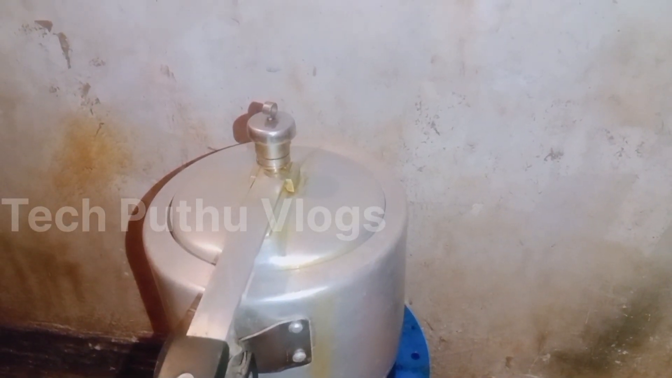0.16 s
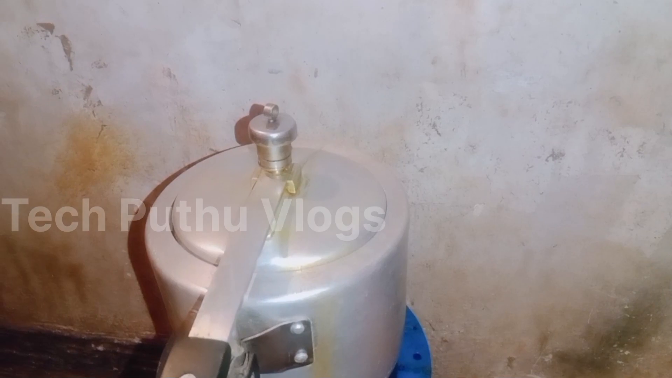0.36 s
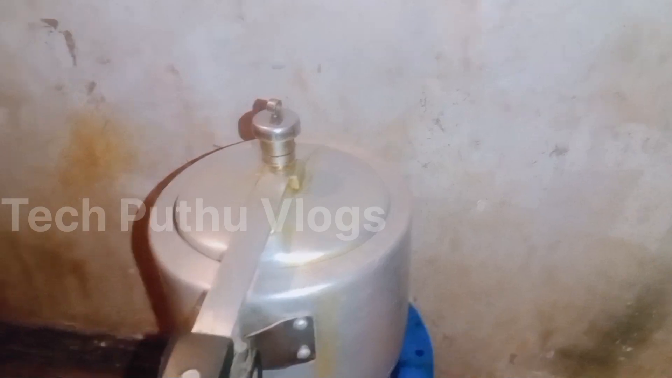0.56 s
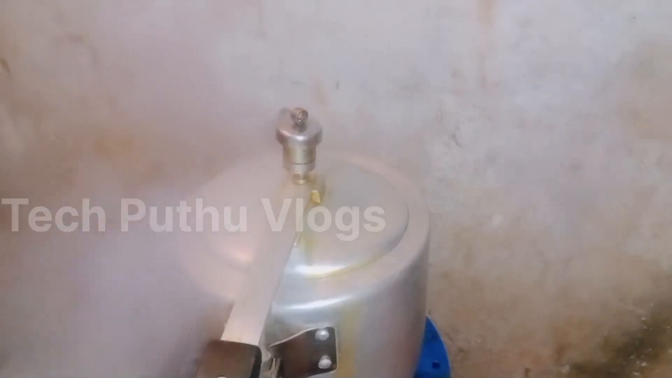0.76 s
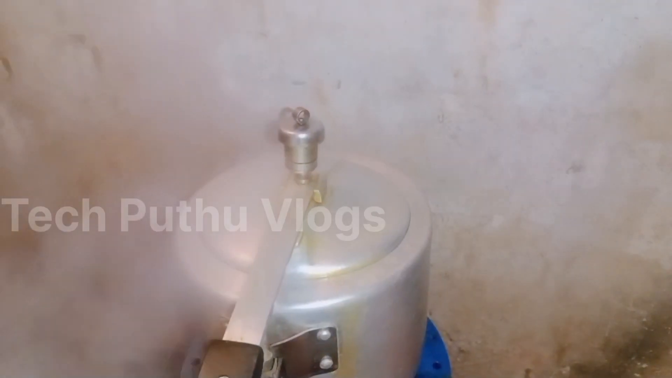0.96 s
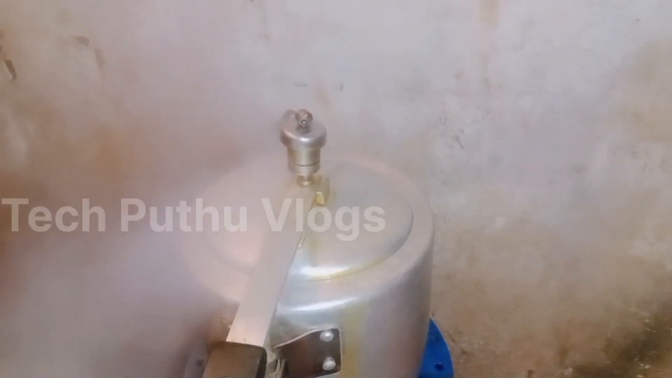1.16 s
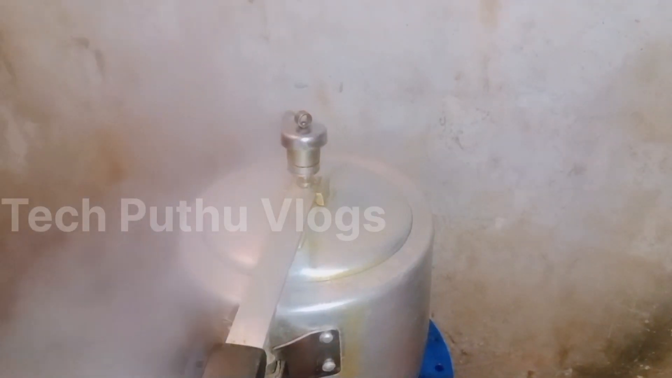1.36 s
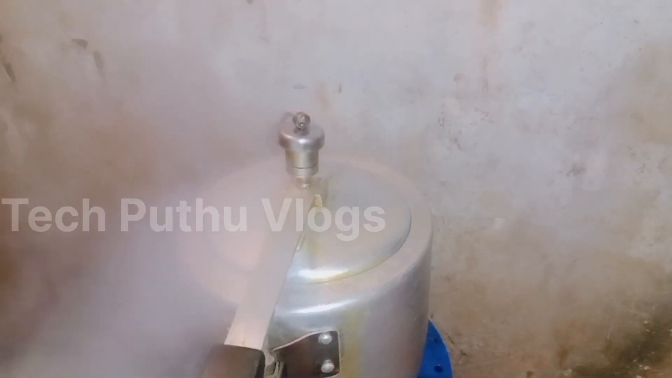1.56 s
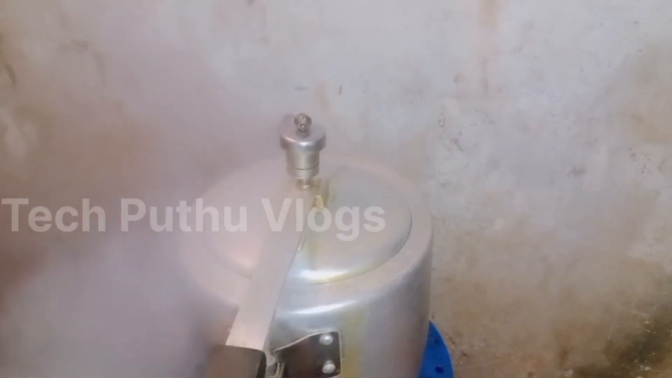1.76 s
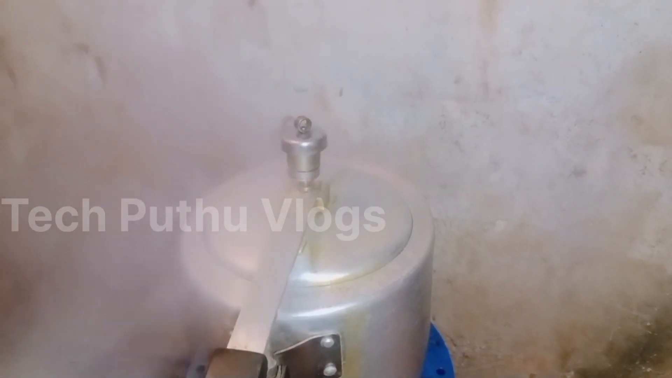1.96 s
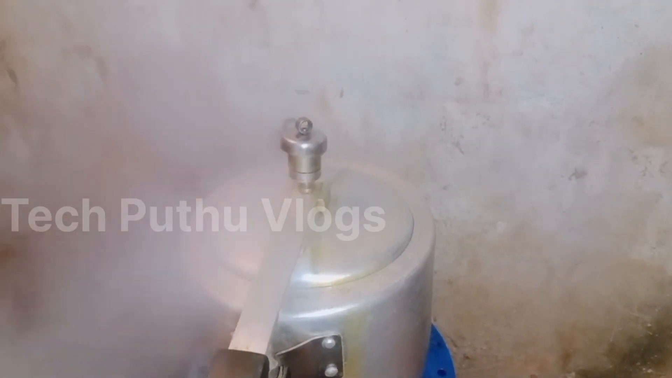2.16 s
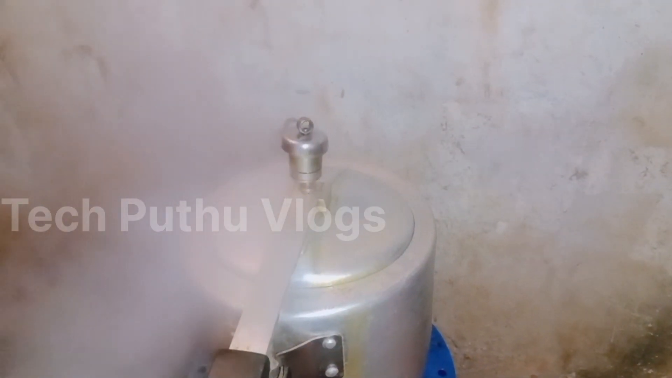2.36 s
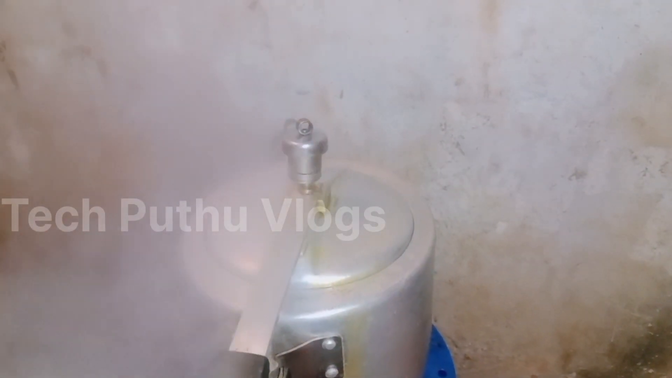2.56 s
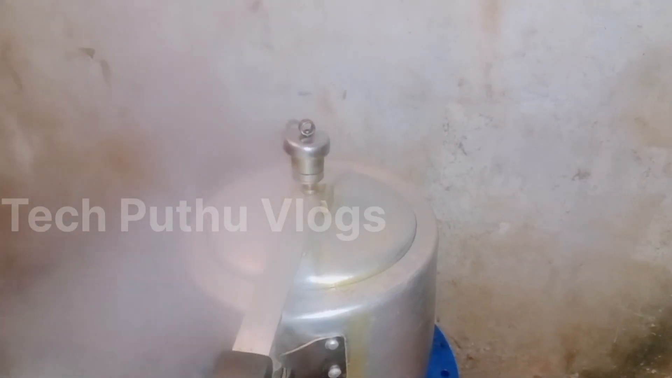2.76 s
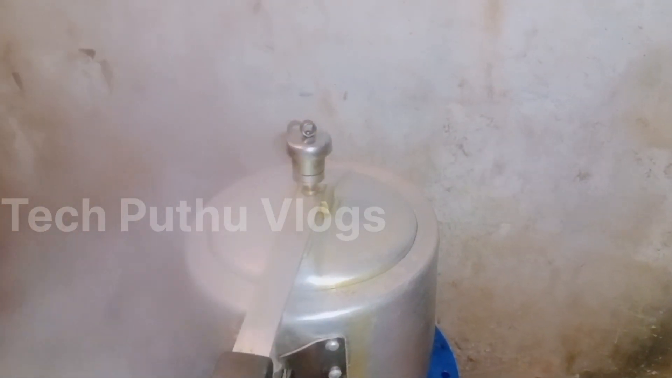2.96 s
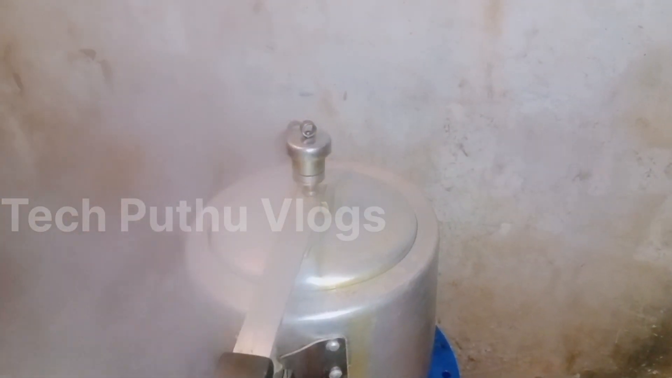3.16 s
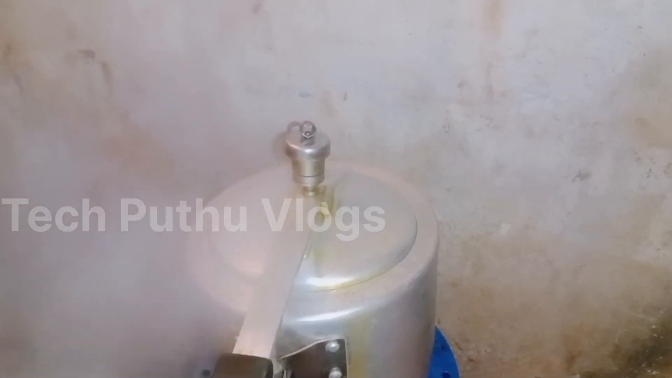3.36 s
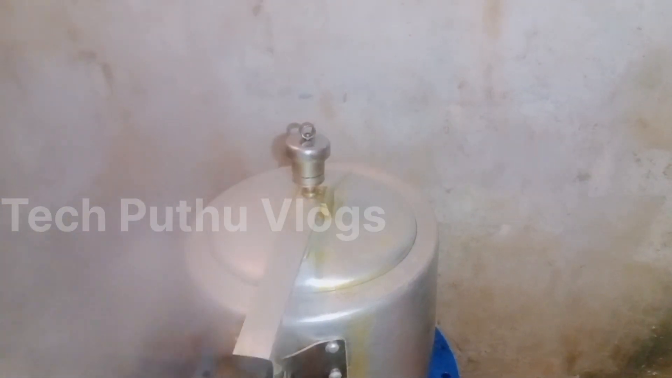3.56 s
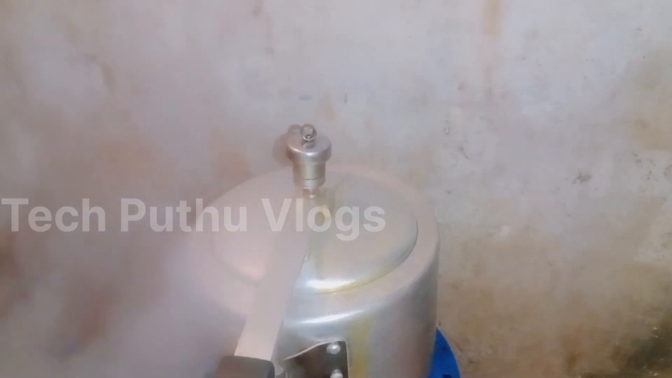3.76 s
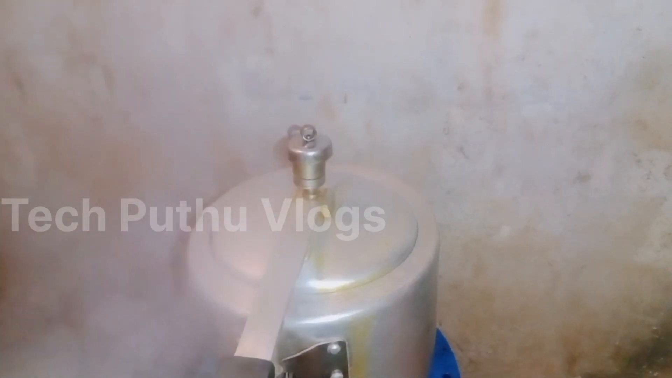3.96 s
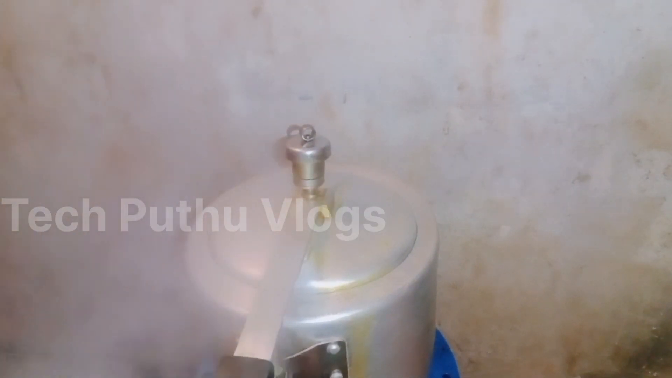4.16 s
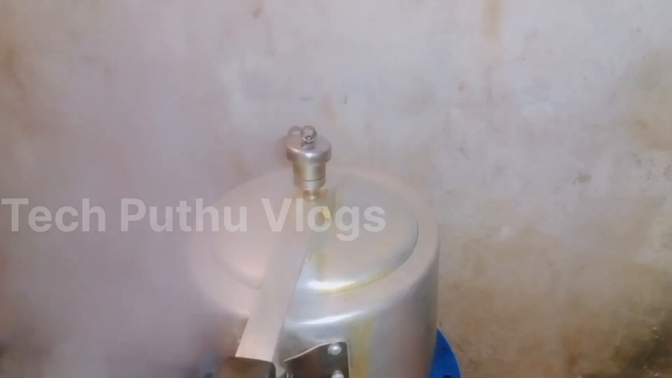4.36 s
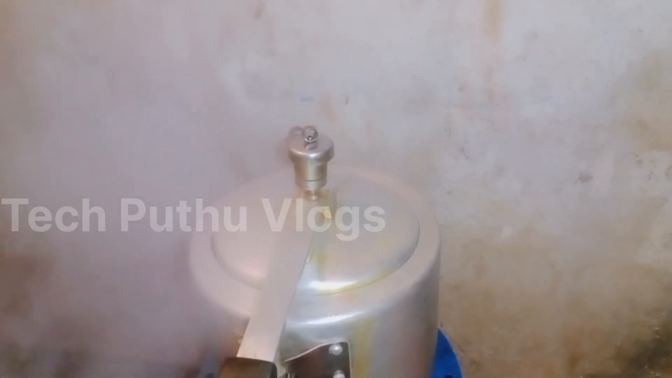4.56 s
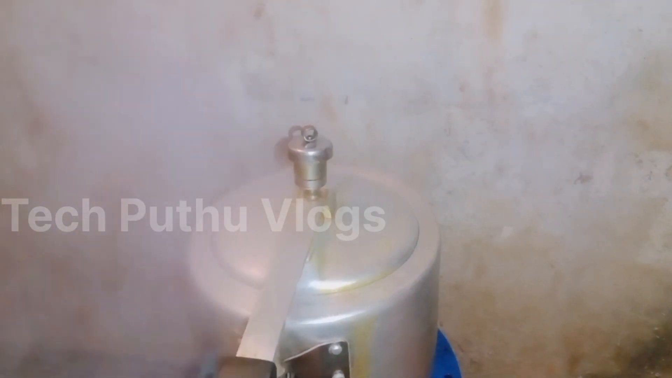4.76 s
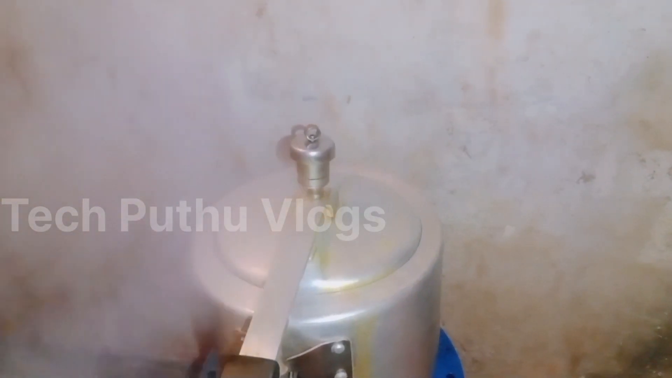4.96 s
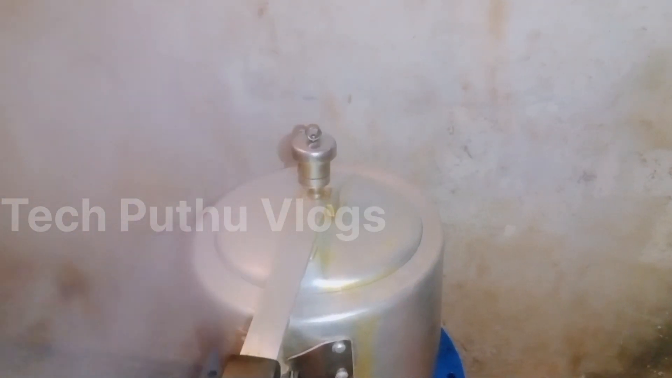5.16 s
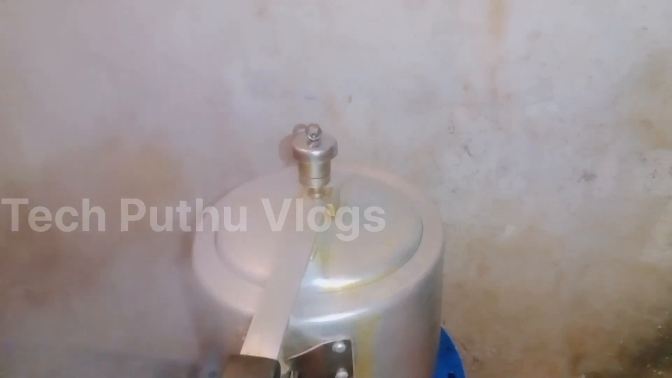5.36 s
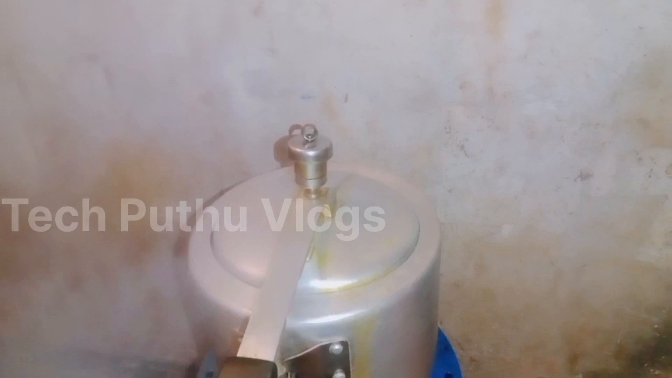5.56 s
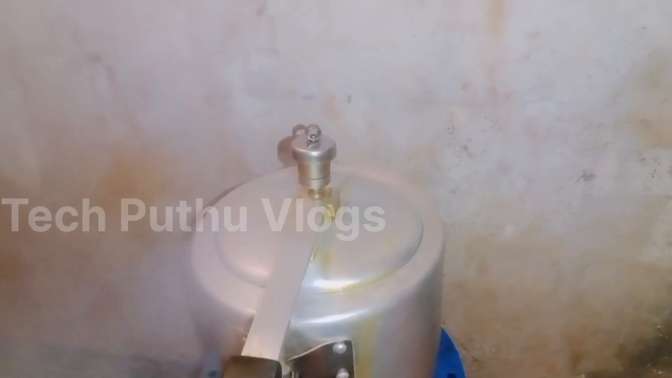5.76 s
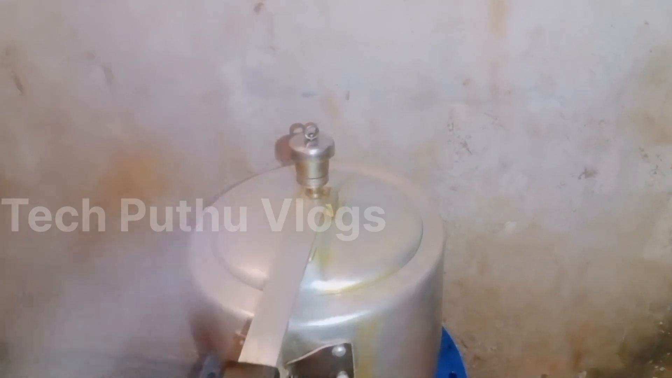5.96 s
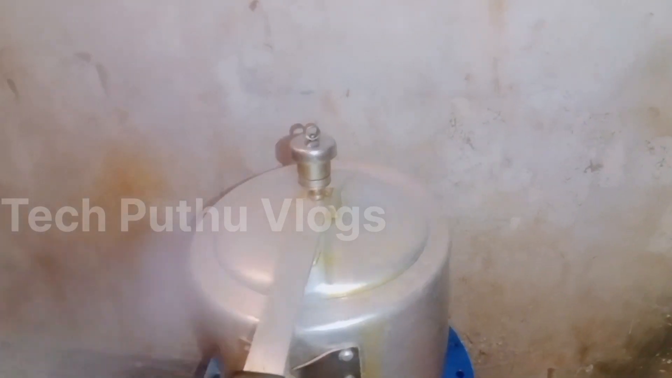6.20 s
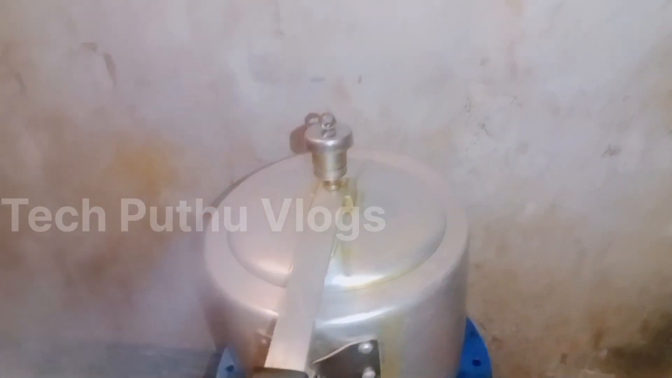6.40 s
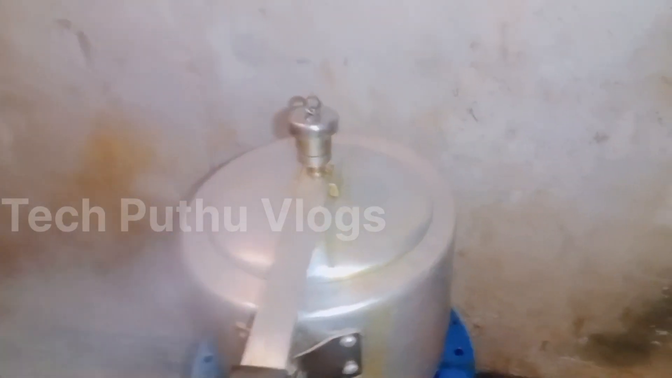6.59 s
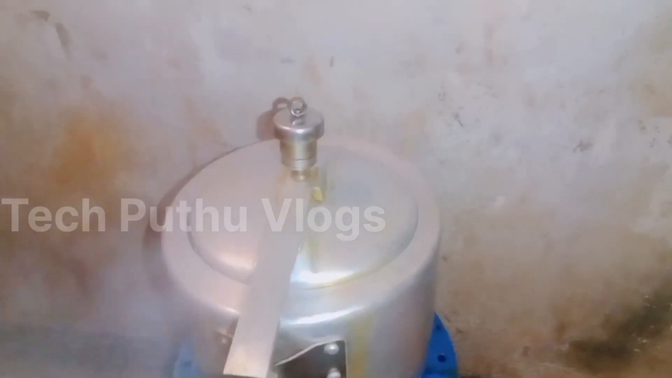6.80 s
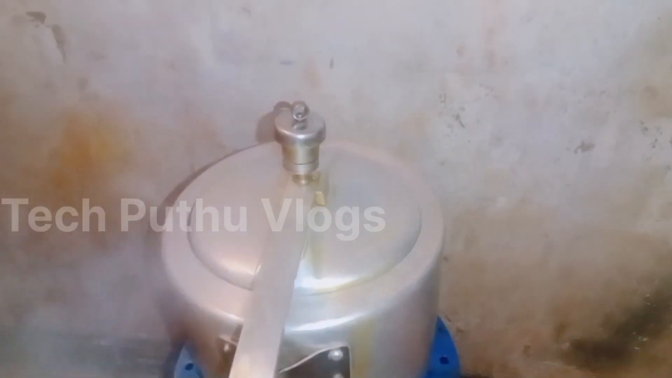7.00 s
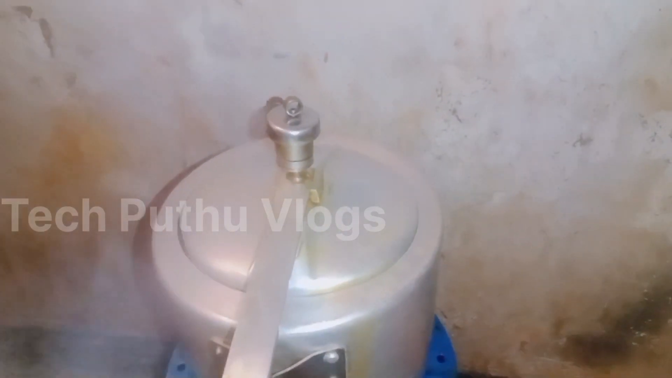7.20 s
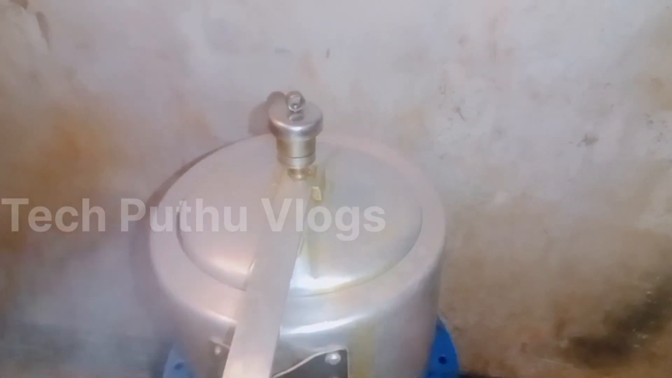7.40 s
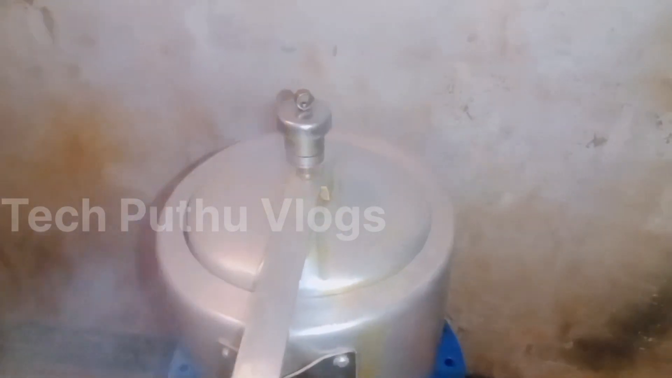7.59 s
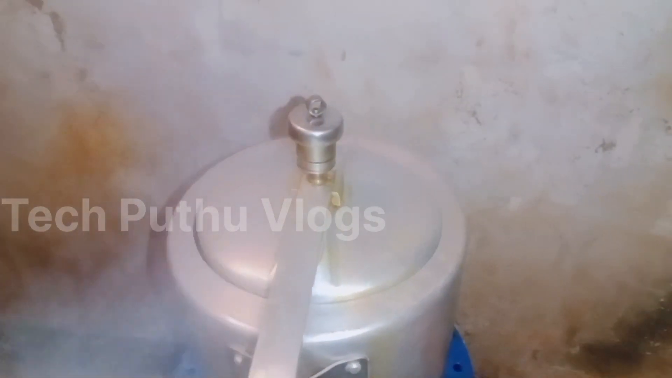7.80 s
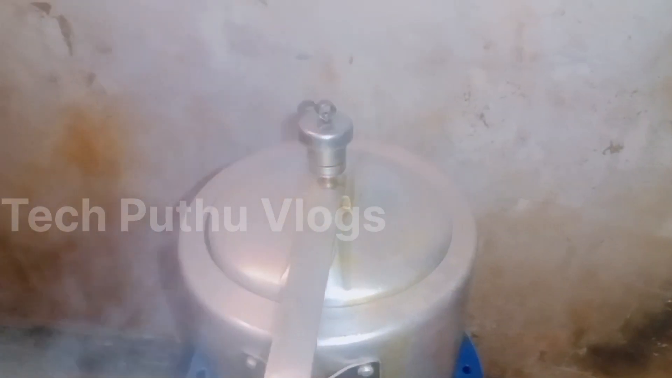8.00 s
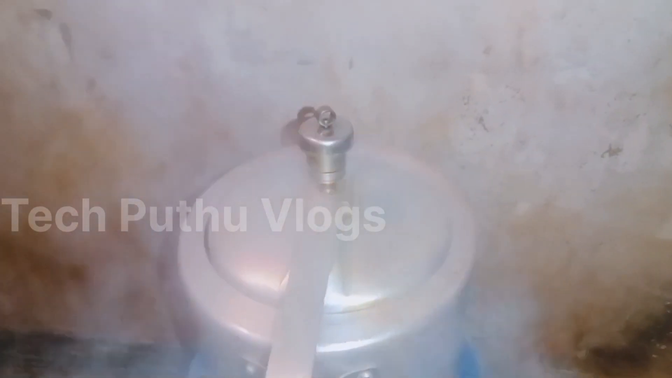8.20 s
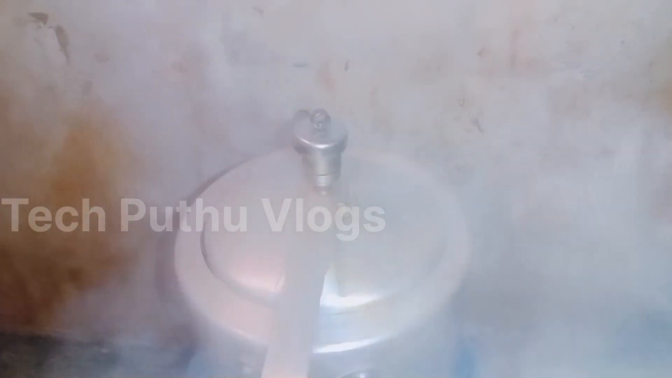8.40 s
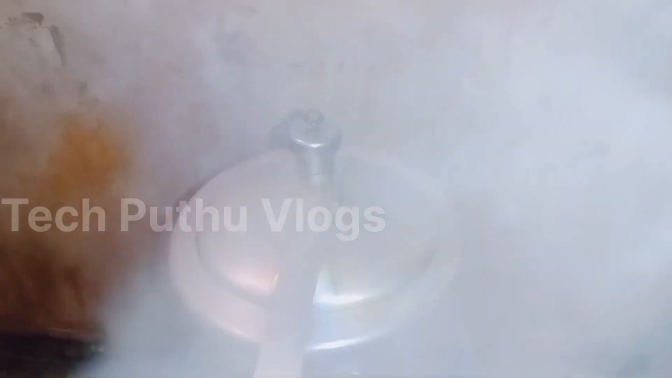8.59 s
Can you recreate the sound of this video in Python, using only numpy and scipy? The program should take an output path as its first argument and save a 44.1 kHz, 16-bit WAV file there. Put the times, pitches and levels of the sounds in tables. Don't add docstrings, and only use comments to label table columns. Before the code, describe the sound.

Pressure cooker leaks soft pulsing hisses, cuts to silence, then its open vent roars in a piercing, continuous metallic hiss, slowly easing.

```python
import sys
import numpy as np
from scipy import signal
from scipy.io import wavfile
from scipy.ndimage import uniform_filter1d

SR = 44100
rng = np.random.default_rng(int(sys.argv[2]) if len(sys.argv) > 2 else 0)


def transcribe(signal):
    frames = np.atleast_2d(signal).T
    limited = np.clip(frames, -1, 1)
    pcm = np.round(limited * 32767).astype(np.int16)
    wavfile.write(sys.argv[1], SR, pcm)


def attenuation_scalar(level_db):
    decades = np.asarray(level_db, float) / 20
    return 10 ** decades


N = 381024
TIME_S = np.arange(N) / SR


def evened(x):
    return x / np.sqrt(np.mean(x ** 2) + 1e-20)


def read(points, hz):
    f, value = np.transpose(points)
    return np.interp(np.log(hz + 1), np.log(f + 1), value)


def column(rows, k):
    rows = np.array(rows)
    return np.interp(TIME_S, rows[:, 0], rows[:, k])


def filtered(x, order, hz, kind="low"):
    return signal.sosfiltfilt(signal.butter(order, hz, kind, fs=SR, output="sos"), x)


def highpassed(x, order, hz):
    return signal.sosfilt(signal.butter(order, hz, "high", fs=SR, output="sos"), x)


def wander(per_s):
    return evened(filtered(rng.standard_normal(N), 2, per_s))


def turbulence(spectra, patchy_db, flicker_db, size=512):
    hop = size // 4
    frames, hz = N // hop + 5, np.fft.rfftfreq(size, 1 / SR)
    a, b, patches = rng.standard_normal((frames, len(hz), 3)).T
    patches = uniform_filter1d(patches, size=8, axis=0)
    patches = evened(uniform_filter1d(patches, size=24, axis=1))
    flicker = evened(uniform_filter1d(rng.standard_normal(frames), size=12))
    colour_db = sum(read(s, hz) for s in spectra)[:, None]
    z = (a + 1j * b) * attenuation_scalar(colour_db + patchy_db * patches + flicker_db * flicker)
    return evened(signal.istft(z, nperseg=size, noverlap=size - hop)[1][:N])


def resonate(x, hz, width):
    turn = np.exp(2j * np.pi * np.cumsum(hz * np.ones(len(x))) / SR)
    r = np.exp(-np.pi * width / SR)
    return 2 * (turn * signal.lfilter([1 - r], [1, -r], x / turn)).real


def narrow_noise(hz, width):
    return evened(resonate(resonate(rng.standard_normal(N), hz, width), hz, width))


# hz, density_db [dB per Hz]
ROOM_COLOUR = [(18, -31), (30, -4), (103, -1), (140, -14), (210, -6), (584, -14), (891, -9), (1100, -10),
               (1430, -39), (2420, -120)]


def room():
    return attenuation_scalar(-71.5) * turbulence([ROOM_COLOUR], patchy_db=0.5, flicker_db=-3.0, size=2048)


# hz, density_db [dB per Hz]
HAND_COLOUR = [(12, -12), (30, 0), (50, -8), (90, -40)]


def hand():
    return attenuation_scalar(-72) * turbulence([HAND_COLOUR], patchy_db=4.0, flicker_db=3.0, size=4096)


# start_s, length_s, pitch_hz, width_hz, level_db
STIR_EVENTS = [
    (.31, .05, 870, 120, -67),
    (.59, .1, 990, 30, -65),
    (0.49, 0.21, 75, 54, -66),
]


def stirs():
    out = np.zeros(N)
    for start_s, length_s, hz, width, db in STIR_EVENTS:
        swell = np.sin(np.pi * np.clip((TIME_S - start_s) / length_s, 0, 1))
        out += attenuation_scalar(db) * narrow_noise(hz, width) * swell
    return out


# peak_s, peak_db
PUFF_EVENTS = [(1.1, -33.5), (1.35, -39), (1.55, -32), (1.73, -33), (2.07, -34), (2.15, -41), (2.325, -41),
               (2.55, -49), (3.43, -44), (3.48, -46), (3.71, -38), (3.9, -41), (4.17, -43), (4.32, -44),
               (4.47, -49), (4.72, -37), (5.02, -41), (5.43, -39.5), (5.722, -44), (5.85, -50), (6.12, -48),
               (6.32, -36), (6.41, -49), (6.47, -44), (6.84, -43), (7.15, -52), (7.84, -54), (8.1, -53),
               (8.26, -53)]


def wash_db():
    calm_db, rise_db_per_s, fall_db_per_s = -59, 146, 145
    power = attenuation_scalar(2 * calm_db)
    for s, db in PUFF_EVENTS:
        slope_db = np.minimum(rise_db_per_s * (TIME_S - s), fall_db_per_s * (s - TIME_S))
        power = power + attenuation_scalar(2 * (db + slope_db))
    return 10 * np.log10(power)


# hz, density_db [dB per Hz]
BUFFET_COLOUR = [(25, -33), (55, -9), (100, -3), (200, 3.5), (450, -8.5), (900, -37)]
# hz, density_db [dB per Hz]
ROAR_BOTTOM_COLOUR = [(90, -40), (200, -15.5), (310, 5), (450, 1), (650, -3), (1000, -30)]


def buffeting():
    memory_s, follows, start_s = 0.19, 0.31, 1.08
    air_db = wash_db()
    lumps = attenuation_scalar(air_db) * turbulence([BUFFET_COLOUR], patchy_db=2.2, flicker_db=2.5, size=1024)
    stirred_db = follows * (uniform_filter1d(air_db, size=round(memory_s * SR)) - air_db.mean())
    swirl = turbulence([ROAR_BOTTOM_COLOUR], patchy_db=2.6, flicker_db=1.8)
    return lumps + (TIME_S >= start_s) * attenuation_scalar(-41.5 + stirred_db) * swirl


# start_s, size_db
INWARD_JUMPS = [(1.085, -5), (1.1034, -21), (1.1684, -10), (1.2321, -10), (1.3085, -14), (1.3614, 1.5),
                (1.473, -13), (1.5206, 6.5), (1.6802, -16), (1.7188, -2), (1.7198, 1.5), (1.7727, -9.8),
                (2.0382, -1), (2.1282, -15), (2.1555, -18), (3.4737, -6), (4.711, -7), (5.416, -12.5),
                (6.305, -19), (6.4387, -14)]
# start_s, size_db
OUTWARD_JUMPS = [(1.0943, -13.5), (1.2736, -7.5), (1.4457, -17), (1.4808, -8), (1.49, -18), (1.5115, -20),
                 (1.533, -10), (1.5653, -15.4), (1.706, -7), (1.7321, -8), (1.788, -7), (2.0812, -20),
                 (2.304, -14), (2.327, -24), (2.3355, -17), (3.4167, -6), (3.4262, -18), (6.422, -19.5)]


def pops():
    eddy_db, eddy_t60_s = -40, 0.064
    pressure, t = np.zeros(N), np.arange(3000) / SR
    for sign, rows in ((0.8, INWARD_JUMPS), (-1.22, OUTWARD_JUMPS)):
        for s, db in rows:
            relax_ms = 1.5 if sign > 0 else 2.8 + 0.1 * db
            hold = np.exp(-1000 / SR / max(relax_ms, .1))
            jumps = attenuation_scalar(eddy_db - 60 * t / eddy_t60_s) * rng.standard_normal(3000)
            jumps[0] = sign
            pressure[round(s * SR):][:3000] += attenuation_scalar(db) * signal.lfilter([1], [1, -hold], jumps)
    pressure = filtered(pressure, 1, 2400)
    pressure = highpassed(pressure, 1, 60)
    return highpassed(pressure, 2, 95)


# time_s, upper_hz, upper_db, lower_hz, lower_db
VENT_TONES = [(1.2, 2065, -39, 1620, -36), (4.5, 2160, -35.5, 1680, -61), (6.5, 2120, -40, 1710, -43),
              (6.95, 2180, -34, 1740, -50), (7.25, 2300, -36, 1770, -35.5), (7.7, 2410, -36, 1750, -35.5),
              (8.1, 2260, -35.5, 1760, -38.5), (8.64, 2270, -35, 1750, -40)]


def edge_tones():
    out = np.zeros(N)
    for k in (1, 3):
        hz = column(VENT_TONES, k) * (1 + 0.02 * wander(1.5))
        tone = narrow_noise(hz, width=200)
        out += attenuation_scalar(column(VENT_TONES, k + 1) + 2.5 * wander(19)) * tone
    return out


def kitchen(x, wet_db, t60, turns_per_s, count=5):
    t = np.arange(8000) / SR
    tails = rng.standard_normal((count, 8000)) * attenuation_scalar(-60 * t / t60) * (t > .002)
    tails = highpassed(tails / np.linalg.norm(tails), 1, 1300)
    rates = turns_per_s * (1 + np.arange(count) / count)
    drift = 2 * np.pi * (np.outer(rates, TIME_S) + rng.random((count, 1)))
    wet = sum(signal.oaconvolve(x, tail)[:N] * np.cos(d) for tail, d in zip(tails, drift))
    return evened(x + attenuation_scalar(wet_db) * wet * np.sqrt(2))


# pitch_hz, width_hz, level_db [over the jet]
POT_MODES = [(2042, 50, -4), (2317, 25, -1), (2870, 50, -2), (3190, 50, -3), (3300, 25, -3), (3741, 25, -6)]
# pitch_hz, width_hz, level_db [over the jet]
LID_MODES = [(5430, 20, 0), (5630, 20, 2), (5904, 22, 5), (6743, 18, 2), (6998, 22, 2), (7394, 25, 2),
             (7667, 40, -2), (7925, 30, -2), (10042, 25, -4), (10903, 25, -1)]


def ringing(jet):
    modes = POT_MODES + LID_MODES
    return jet + sum(attenuation_scalar(db) * resonate(jet, hz, width) / 2 for hz, width, db in modes)


# hz, density_db [dB per Hz]
PORT_COLOUR = [(1200, -13), (2250, -10), (3700, -11.5), (4300, -18), (4780, -30.5), (5200, -18.5),
               (6100, -12.5), (6950, -2), (7900, 1), (8950, -3.5), (9350, -13), (10100, -9.5),
               (13000, -16.5), (13900, -19.5)]
# hz, density_db [dB per Hz]
PORT_TOP = (15100, -11.5)


def steam(tilt, patchy_db, wet_db, turns_per_s, size):
    jet = turbulence([PORT_COLOUR + [PORT_TOP], tilt], patchy_db, flicker_db=0.5, size=size)
    return kitchen(ringing(jet), wet_db, t60=.2, turns_per_s=turns_per_s)


# peak_s, peak_db
THROB_EVENTS = [
    (-.02, -48),
    (.095, -41),
    (.2, -41.5),
    (.33, -41.5),
    (.45, -42.5),
    (.6, -36.5),
    (.72, -35),
]


def rocking_db():
    times, peaks_db = np.transpose(THROB_EVENTS)
    opening = .5 + .5 * np.cos(2 * np.pi * np.interp(TIME_S, times, np.arange(len(times))))
    rest_db = -43.5 - 90 * (np.diff(times) - 0.1)
    shut_db = np.interp(TIME_S, (times[1:] + times[:-1]) / 2, rest_db)
    return shut_db + opening * (np.interp(TIME_S, times, peaks_db) - shut_db)


# hz, level_db
LEAK_COLOUR = [(600, -40), (1150, -12), (1400, -0.5), (2300, -3.5), (3700, -9), (4800, -9), (5800, -0.5),
               (7700, 1), (11400, -3), (12700, 2), (15500, -6)]


def leak():
    hiss = steam(LEAK_COLOUR, patchy_db=2.5, wet_db=-7, turns_per_s=0.36, size=1024)
    low = filtered(hiss, 4, 4750)
    level_db = rocking_db()
    steadied_low = low * attenuation_scalar(-0.15 * (level_db + 46.0))
    return attenuation_scalar(level_db) * (hiss - low + steadied_low)


def sag(db_per_s):
    return -db_per_s * (TIME_S - 1.26)


# hz, level_db
BLAST_COLOUR = [(100, -72), (300, -12.5), (600, -1), (1200, 1), (10800, 1), (11400, -0.5), (12700, 4.5),
                (13900, 0.5), (15500, -1)]
# time_s, level_db [on the shrill band]
JET_AIM = [(1.25, 0.5), (1.85, -0.5), (2.3, 0.5), (2.9, -0.7), (3.35, 1), (3.7, -0.5), (4.25, 0),
           (4.55, -1), (4.9, -0.1), (5.75, 0.3), (6.05, -1), (6.35, 1), (6.65, -0.5), (7.1, 0.8),
           (7.55, -0.5), (7.85, 0.9), (8.2, 0.8), (8.6, 0.2)]


def blast():
    jet = steam(BLAST_COLOUR, patchy_db=1.0, wet_db=-8, turns_per_s=.045, size=512)
    roar = filtered(jet, 4, 4750)
    fizz = filtered(jet, 2, 11000, "high")
    shrill = jet - roar - fizz
    aim_db = column(JET_AIM, 1)
    shrill = shrill * attenuation_scalar(sag(0.5) + aim_db)
    roar = roar * attenuation_scalar(-0.5 + sag(0.5342) + 0.2 * aim_db)
    fizz = fizz * attenuation_scalar(-1.7 + sag(0.46) + 0.1 * aim_db)
    return attenuation_scalar(-12.25) * (shrill + roar + fizz)


def scene():
    cut_s, fade_from_s, fade_to_s = .729, 0.96, 1.26
    fade = np.clip((TIME_S - fade_from_s) / (fade_to_s - fade_from_s), 0, 1) ** 0.76
    leaking = leak() + room() + stirs()
    blowing = blast() + edge_tones() + buffeting() + hand()
    mono = leaking * (TIME_S < cut_s) + blowing * fade + pops()
    return np.array([mono, mono])


def roll_off(x):
    return signal.sosfilt(signal.butter(12, 15640, fs=SR, output="sos"), x)


def record(dry):
    edge = signal.firwin(1501, 15480, window=("kaiser", 11), fs=SR)[None]
    mix = signal.oaconvolve(np.clip(dry, -1.1, 1.1), edge, "same")
    return roll_off(mix)


dry = scene()
out = record(dry)
transcribe(out)
```